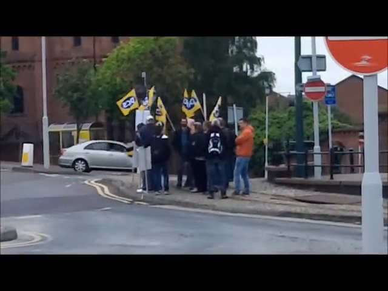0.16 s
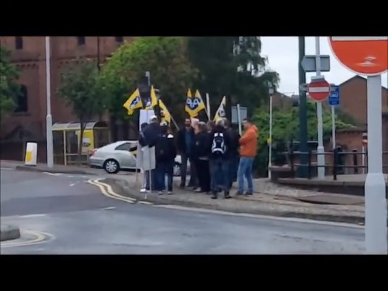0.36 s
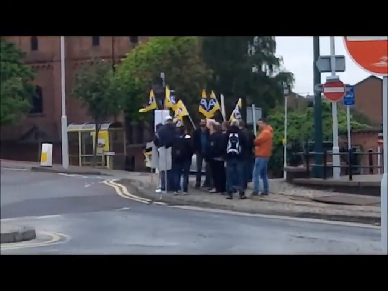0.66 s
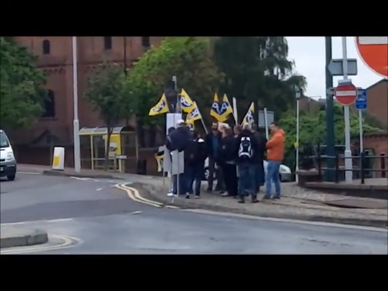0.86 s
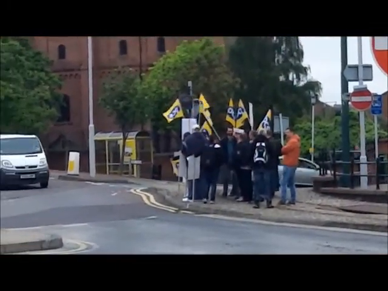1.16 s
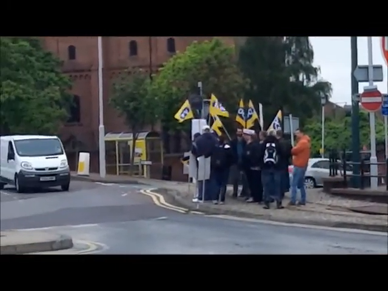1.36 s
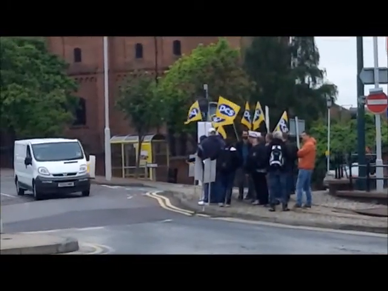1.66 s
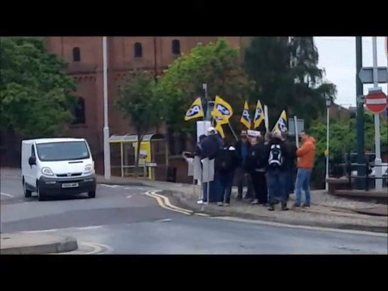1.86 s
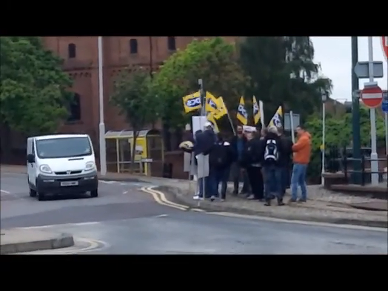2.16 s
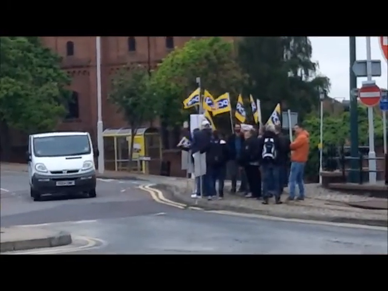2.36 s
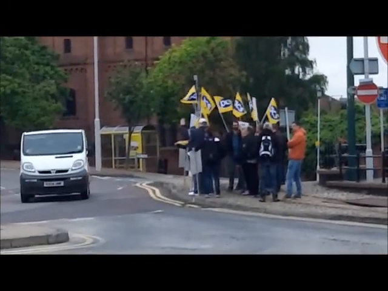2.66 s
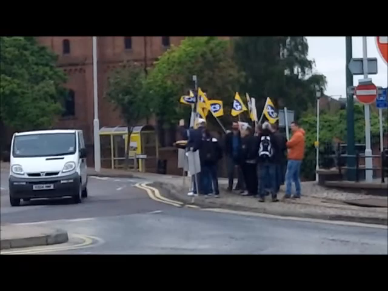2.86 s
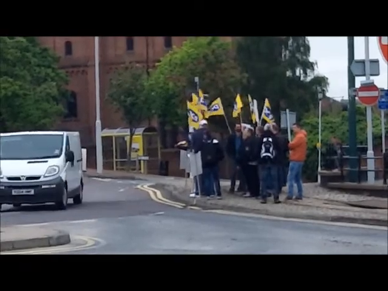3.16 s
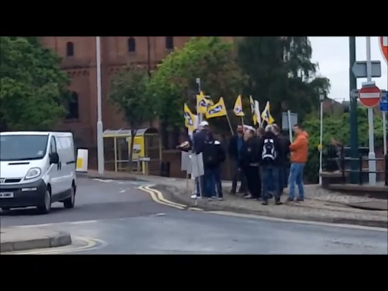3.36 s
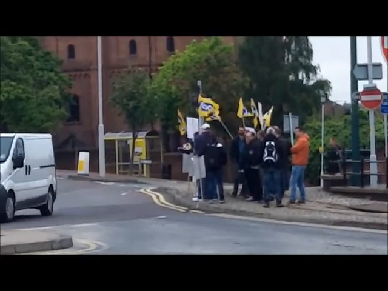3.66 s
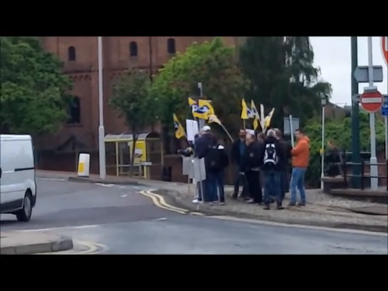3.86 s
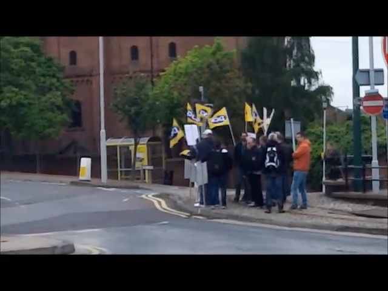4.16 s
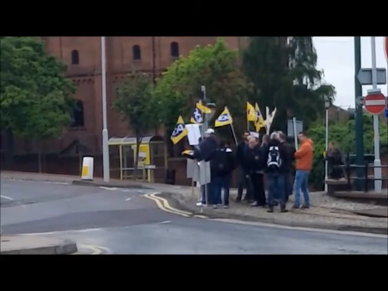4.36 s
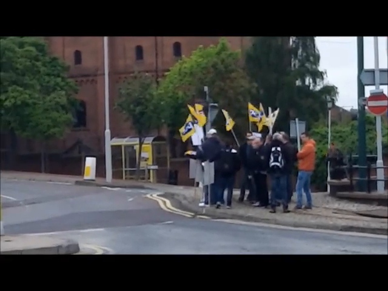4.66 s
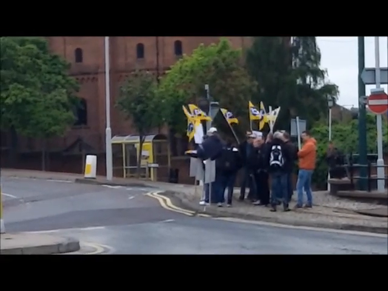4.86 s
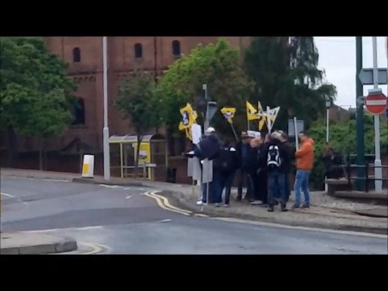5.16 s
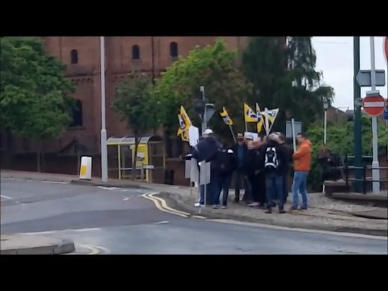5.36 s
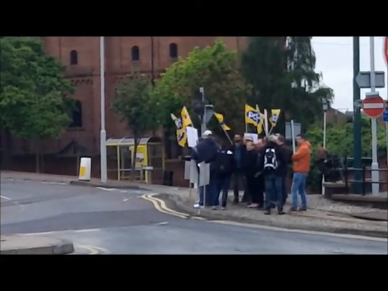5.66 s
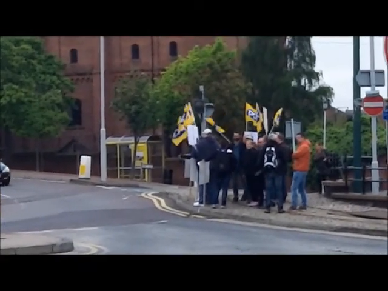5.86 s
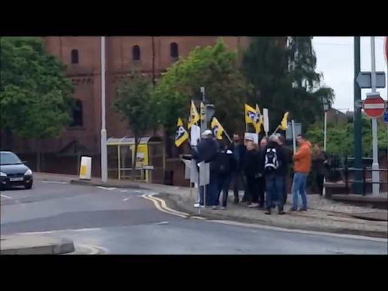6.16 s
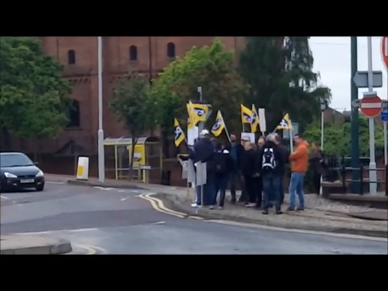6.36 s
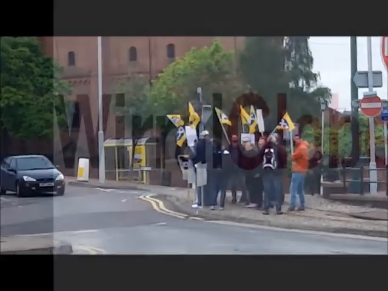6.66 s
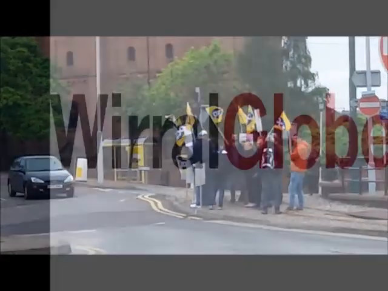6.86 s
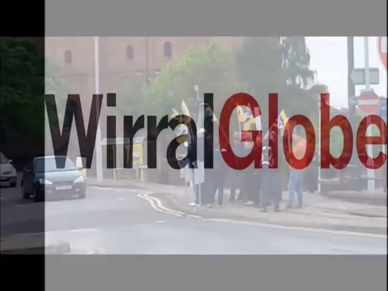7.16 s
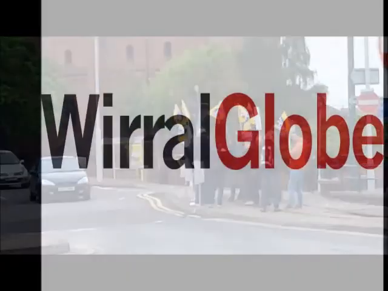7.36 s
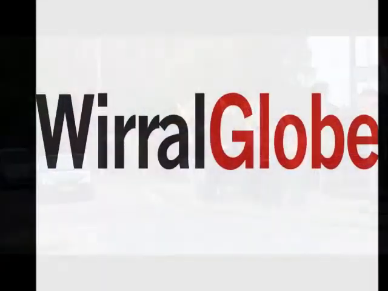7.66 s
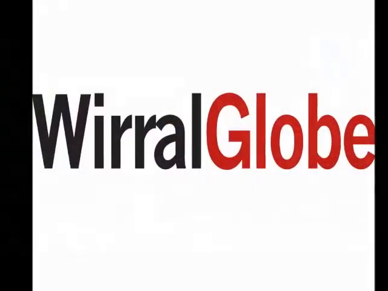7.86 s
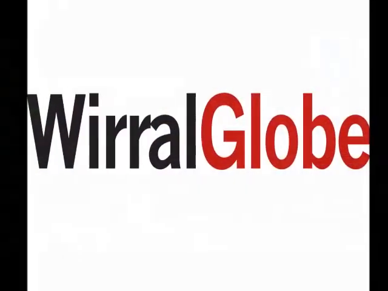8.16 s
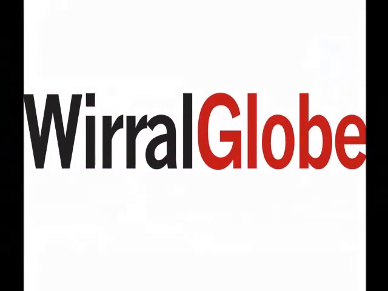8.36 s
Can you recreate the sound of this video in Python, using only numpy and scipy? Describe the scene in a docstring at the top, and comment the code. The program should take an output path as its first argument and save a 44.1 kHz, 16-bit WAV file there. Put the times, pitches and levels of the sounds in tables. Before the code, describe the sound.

Steady tyre roar and hiss at a road junction over throbbing diesel idles, with two quick horn taps early, fading gradually to silence.

```python
"""Tyres roar and hiss at a road junction heard from the pavement: shaped noise swells as each vehicle goes by.
Two diesels idle close by and beat against each other: steady tones at firing rates that differ slightly.
An alternator whines, gears and a brake sound as thin wavering tones, and injectors tick as gated noise.
A van taps its horn twice, summed from harmonics, and the walls answer with delayed, filtered copies.
All is mono and fades to silence in small steps."""
import sys
import numpy as np
from scipy import signal
from scipy.fft import rfft, irfft, next_fast_len
from scipy.io import wavfile
from scipy.ndimage import uniform_filter1d, map_coordinates

SR = 44100
rng = np.random.default_rng(int(sys.argv[2]) if len(sys.argv) > 2 else 0)


def master(y):
    """Save y as 16-bit WAV."""
    cut = np.clip(np.atleast_2d(y).T, -1, 1)
    pcm = np.round(cut * 32767)  # scale
    wavfile.write(sys.argv[1], SR, pcm.astype(np.int16))


N = 374850  # length in samples


def amp(db):
    """Turn decibels into gain."""
    return 10 ** (np.asarray(db) / 20)


def unit(x):
    """Scale x to an rms of 1."""
    return x / np.sqrt(np.mean(x ** 2) + 1e-20)


def curves(rows):
    """Join the points of each column after the time with straight lines, one value per sample."""
    times, *columns = np.transpose(rows)
    return [np.interp(np.arange(N) / SR, times, column) for column in columns]


def wobble(rate):
    """A smooth random curve with this many random points a second."""
    points = rng.standard_normal(int(N * rate / SR) + 4)
    return map_coordinates(points, [np.arange(N) * rate / SR])


def filtered(x, response):
    """Multiply the spectrum of x by a response that depends on frequency."""
    padded = next_fast_len(N + SR // 2)
    spectrum = rfft(x, padded) * response(np.fft.rfftfreq(padded, 1 / SR))
    return irfft(spectrum, padded)[..., :N]


def rush(spectrum, patchy_db, gate=1):
    """Coloured noise of rms 1, with random louder and softer patches in time and pitch."""
    grid = signal.stft(gate * rng.standard_normal(N), nperseg=512)[2]
    patches = uniform_filter1d(rng.standard_normal(grid.shape), 5, axis=0)
    patches = uniform_filter1d(patches, 10, axis=1)
    noise = signal.istft(grid * amp(patchy_db * unit(patches)), nperseg=512)[1][:N]
    f, db = np.transpose(spectrum)

    def colour(hz):
        return amp(np.interp(np.log(hz + 1), np.log(f + 1), db, -120, -120))

    return unit(filtered(noise, colour))


def tone(hz, db, partials, waver, flicker_db, lag=0, flickers_per_s=6):
    """Partials on one pitch track; the pitch wavers by a share and each partial flickers on its own."""
    turns = np.cumsum(hz * (1 + waver * wobble(25))) / SR - lag
    total = 0
    for multiple, level in partials:
        flicker = amp(level + flicker_db * wobble(flickers_per_s))
        total = total + flicker * np.cos(2 * np.pi * multiple * turns)
    return amp(db) * np.sqrt(2) * total  # the root of 2 makes the levels rms


def nearness(s, nears_s, leaves_s):
    """Power share of a source passing at steady speed: it falls with distance squared."""
    t = np.arange(N) / SR - s
    return 1 / (1 + (t / np.where(t < 0, nears_s, leaves_s)) ** 2)


# steady hiss at the top of the range: (f/Hz, level/dB per Hz)
TOP_HISS = [(7900, -94), (8150, -10), (8600, -6.5), (9800, 0), (10400, -4.5), (11600, -3), (11900, -33.5),
            (12200, -2.5), (15000, -4), (15600, -5.5)]


def top_hiss():
    """Steady, faint noise confined to the highest treble."""
    return amp(-57.0) * rush(TOP_HISS, patchy_db=2.0)


# brief faint hums in the traffic: (t/s, f/Hz, level/dB)
HUMS = [(.88, 427, -39.5), (1.38, 497, -38), (3.02, 570, -39.5), (3.05, 492, -43), (4.45, 720, -38.5)]
# a lone partial: (multiple of the pitch, level/dB)
SINGLE = [(1, 0)]
HUM_S = .19  # time for a hum to swell or sink by 6 dB


def hums():
    """Short low tones that swell out of the roar and sink back."""
    t = np.arange(N) / SR
    total = np.zeros(N)
    for s, hz, db in HUMS:
        swell_db = db - 6 * ((t - s) / HUM_S) ** 4
        total += tone(hz, swell_db, SINGLE, waver=.002, flicker_db=1.5)
    return total


# light brake squeal, sounded at 0.99 of this pitch: (t/s, f/Hz, level/dB)
BRAKE = [(6.5, 5950, -75), (6.65, 5880, -62), (6.9, 5750, -56), (7.1, 5700, -62), (7.3, 5680, -75)]


def brake():
    """A faint high tone sinks in pitch and flickers as a car slows down."""
    return tone(*curves(BRAKE), [(0.99, 0.0019)], waver=0.0038, flicker_db=5.0)


# gear tones, moving away and then coming near: (t/s, f/Hz, level/dB)
GEARS_AWAY = [(0, 706, -39), (.65, 705, -39.5), (1.1, 703, -43.5), (1.3, 702, -65)]
GEARS_NEAR = [(5.7, 700, -65), (5.95, 715, -46), (6.25, 735, -50), (6.31, 742, -36), (6.4, 768, -34.5),
              (6.47, 778, -36), (6.54, 778, -42), (6.62, 778, -34.5), (6.72, 770, -33), (6.85, 757, -35),
              (7.05, 745, -35), (7.12, 740, -60)]
# unsteadiness of the receding gears and the exhaust drone: pitch share, dB, flickers a second
DRONE_WAVER, DRONE_FLICKER_DB, DRONE_FLICKERS_PER_S = .007, 2.5, 12


def gears():
    """Two single gear tones: the receding one is broken, the nearing one steadier."""
    away = tone(*curves(GEARS_AWAY), SINGLE, waver=DRONE_WAVER, flicker_db=DRONE_FLICKER_DB,
                flickers_per_s=DRONE_FLICKERS_PER_S)
    near = tone(*curves(GEARS_NEAR), SINGLE, waver=.001, flicker_db=-1.5)
    return away + near


# the waiting engine settles, idles and pulls away:
# (t/s, firing rate f/Hz, engine level/dB, alternator level/dB)
WAITING = [(0, 29.26, -44, -60), (.7, 29.3, -44, -56), (1, 29.5, -44, -55), (1.5, 29.75, -42.5, -54),
           (2.5, 29.9, -40, -52), (3.2, 30.0, -40, -51), (3.8, 30.0, -40, -51), (4.2, 29.86, -40, -51.5),
           (4.8, 30.0, -40.5, -51.5), (6.15, 30.03, -42, -51.5), (6.35, 30.1, -45, -75),
           (6.8, 30.2, -52, -75)]
# alternator lines: multiples of its pitch
WHINE_LINES = [9, 13, 15.95, 17, 17.92]
# the lines swell and sink at different times: (t/s, then level/dB of each line over the alternator level)
WHINE_SWELLS = [(0, 0, 0, -4, -3, -6), (1.8, 1, 1, -4, -2, -2), (2.2, 3, 4, 4, -3, -1),
                (3.02, 0, 5, -2, -2, -4), (3.15, 0, 6, -2, 8, -5), (3.3, 0, 6, -2, 8, -5),
                (3.42, 0, 4, -2, 1, -4), (3.58, 1, 6, 7, 4, -3), (4.1, 6, -2, -1, 1, -2),
                (4.6, 5, 4, 6, 4, -4), (5.0, 2, 7, 2, 3, -3), (5.4, 6, 8, -2, 6, -4), (6.2, 2, 7, 0, 5, -5)]
PULLEY = 8.373  # alternator pitch over the firing rate
HUNT, HUNTS_PER_S = .0012, 2.5  # the belt's speed wanders: share, random points a second
# the lines come in short dashes: pitch share, dB, flickers a second
WHINE_WAVER, WHINE_FLICKER_DB, WHINE_FLICKERS_PER_S = .0012, 2.2, 13


def alternator():
    """Thin lines driven by the engine through a belt, so their pitch follows the firing rate."""
    rate, _, db = curves(WAITING)
    pitch = PULLEY * rate * (1 + HUNT * wobble(HUNTS_PER_S))
    lines = zip(WHINE_LINES, curves(WHINE_SWELLS))
    return tone(pitch, db, lines, waver=WHINE_WAVER, flicker_db=WHINE_FLICKER_DB,
                flickers_per_s=WHINE_FLICKERS_PER_S)


# horn taps: (t/s, length/s, level/dB, echo level/dB, extra third-harmonic level/dB, extra fifth level/dB)
# the harmonic levels change as the van turns
TOOTS = [(1.236, .038, -17, 1, 0, 1), (1.389, .035, -16, -6.5, 2, -6)]
# horn sound: (harmonic number, level/dB, rise/s)
HORN = [(1, -14, .02), (2, -7.5, .015), (3, -4, .022), (4, 0, .018), (5, -7, .016), (6, -11.5, .03),
        (7, -17, .016)]
# echoes: (delay/s, level/dB, brightest f/Hz)
WALLS = [(.036, -6, 1300), (.04, -7, 2800), (.118, 1.5, 1500), (.135, -7, 1450), (.195, -5, 1400),
         (.268, -11, 1950), (.338, -8, 1750)]
HORN_HZ = 512.6
SAG, SETTLE_S = .016, .012  # the reed starts flat by this share and settles with this time constant


def soft(u):
    """A smooth step from 0 to 1 as u goes from 0 to 1."""
    return np.sin(np.clip(u, 0, 1) * np.pi / 2) ** 2


def walls(f):
    """Each wall delays the horn and favours its own band of frequencies."""
    total = 0
    for delay, db, hz in WALLS:
        octave_band = (np.log((f + 1) / hz) / .33) ** 2
        total = total + amp(db) * np.exp(-2j * np.pi * f * delay - octave_band)
    return total


def horn():
    """Two short taps of a disc horn, with echoes from walls and a diffuse tail of fading noise."""
    t = np.arange(N) / SR
    direct, thrown = np.zeros(N), np.zeros(N)
    for s, length, db, echo_db, third_db, fifth_db in TOOTS:
        age = np.abs(t - s)
        turns = HORN_HZ * (age + SAG * SETTLE_S * np.exp(-age / SETTLE_S))
        extra_db = {3: third_db, 5: fifth_db}
        reed = np.zeros(N)
        for k, level, rise in HORN:
            strength = amp(level + extra_db.get(k, 0)) * soft((t - s) / rise)
            reed += strength * np.sin(2 * np.pi * k * (turns + rng.random()))
        tap = amp(db) * soft((s + length - t) / 0.012) * reed
        direct += tap
        thrown += amp(echo_db) * tap
    tail_t = t[:SR // 2]
    tail = rng.standard_normal(len(tail_t)) * amp(-60 * tail_t / .9)  # falls 60 dB per 0.9 s
    diffuse = signal.fftconvolve(direct, tail / np.linalg.norm(tail))[:N]
    return direct + filtered(thrown, walls) + amp(-5.5) * diffuse


# colour of the ticking: (f/Hz, level/dB per Hz)
INJECTORS = [(3400, -40), (4200, 0), (5200, -5.5), (5700, -15.5), (6150, -2), (6500, -10.5), (7000, -41.5)]
# loudness of the ticking: (t/s, level/dB)
TICKING = [(0, -48.5), (.25, -43), (.7, -49), (1.2, -51), (2.6, -55), (3.2, -46), (4, -49), (5, -51),
           (7.8, -62)]
# tick strength of the firings in one shaft turn: level/dB of each
CYLINDERS = [-2, -2, 0]
TICK_LAG, TICK_DECAY_DB = .33, 50  # share of a firing before the tick, fall over one firing


def injectors():
    """Sharp ticks once a firing; the three firings of a shaft turn differ in strength."""
    turns = np.cumsum(curves(WAITING)[0]) / SR + 1 - TICK_LAG
    cylinder_db = np.array(CYLINDERS)[turns.astype(int) % len(CYLINDERS)]
    ticks = amp(cylinder_db + 1.1 * wobble(11) - TICK_DECAY_DB * (turns % 1))
    return amp(curves(TICKING)[0]) * rush(INJECTORS, patchy_db=1.5, gate=ticks)


# exhaust drone: (t/s, f/Hz, level/dB)
DRONE = [(0, 248, -60), (.22, 250, -52), (.38, 250.3, -35.5), (.6, 244.5, -50), (1.3, 246, -42.5),
         (1.9, 254.8, -40.5), (2.12, 256.7, -36), (2.3, 254, -65)]


def exhaust_drone():
    """One broken, unsteady low tone."""
    return tone(*curves(DRONE), SINGLE, waver=2 * DRONE_WAVER, flicker_db=DRONE_FLICKER_DB,
                flickers_per_s=DRONE_FLICKERS_PER_S)


# an approaching car's engine: (t/s, firing rate f/Hz, level/dB)
CAR = [(5.35, 39, -60), (5.55, 39.3, -41), (5.7, 40.2, -40), (5.85, 40.2, -43), (6.0, 40.6, -39),
       (6.2, 40.3, -43), (6.35, 40, -60)]
# its partials: (multiple of firing rate, level/dB)
CAR_ORDERS = [(4, 0), (5, -1.5), (6, -4)]


def car_engine():
    """Higher multiples of the firing rate, with a slight waver."""
    return tone(*curves(CAR), CAR_ORDERS, waver=.003, flicker_db=0.5)


# the van engine's partials: (multiple of firing rate, level/dB)
VAN_ORDERS = [(2, -1), (3, -11.5), (6, -12.5)]
VAN_HZ, VAN_DB = 23.83, -39  # firings a second, level at the nearest moment
VAN_S, VAN_NEARS_S, VAN_LEAVES_S = 1.8, .9, .4  # nearest moment, times for 3 dB before and after


def van_engine():
    """A steady engine tone that swells and fades with the van's distance."""
    near = nearness(VAN_S, VAN_NEARS_S, VAN_LEAVES_S) ** .5  # root turns power into gain
    return near * tone(VAN_HZ, VAN_DB, VAN_ORDERS, 0, flicker_db=0.0)


# partials of the parked and the waiting engine: (multiple of firing rate, level/dB)
PARKED_ORDERS = [(1, 1.5), (2, -8.5)]
WAITING_ORDERS = [(1, -0.5), (2, -3.5), (4, -10)]
PARKED_HZ, PARKED_DB = 27.48, -42  # steady idle: firings a second, level
PARKED_LAG = .2  # share of a firing by which it starts behind the waiting engine


def idling_diesels():
    """Low multiples of two close firing rates, which beat about twice a second."""
    rate, db, _ = curves(WAITING)
    parked = tone(PARKED_HZ, PARKED_DB, PARKED_ORDERS, 0, flicker_db=0.0, lag=PARKED_LAG)
    waiting = tone(rate, db, WAITING_ORDERS, 0, flicker_db=2.6)
    return parked + waiting


# distant traffic: level/dB of exhaust rumble, tyre roar, tread hiss, body drumming
STREET_DB = (-32.5, -26, -33, -36)
# vehicles going by: (nearest t/s, time to fall 3 dB/s, then at the nearest point
# rumble level/dB, roar level/dB, hiss level/dB, drumming level/dB)
PASSES = [(0.1, .5, -35.5, -32.5, -33, -38.5), (1.2, 0.55, -38.5, -38, -36, -36.5),
          (3.1, 0.5, -55, -30.5, -38, -43.5), (4.3, 0.44, -38, -35, -39.5, -39.5),
          (5.75, 1.5, -45.5, -38.5, -42.5, -44.5), (6.75, 0.55, -38, -37, -38.5, -34.5),
          (7.7, 0.06, -38, -27.5, -31.5, -37)]
SWAY_DB, SWAYS_PER_S = .5, 2.954  # each layer drifts on its own: size, random points a second


def street():
    """Gains of rumble, roar, hiss and drumming: the powers of distant and passing traffic add up."""
    power = amp(STREET_DB)[:, None] ** 2
    for s, span, *db in PASSES:
        power = power + amp(db)[:, None] ** 2 * nearness(s, span, span)
    return [np.sqrt(p) * amp(SWAY_DB * wobble(SWAYS_PER_S)) for p in power]


# exhaust rumble: (f/Hz, level/dB per Hz)
RUMBLE = [(8, -22.5), (20, -13.5), (30, -10.5), (40, -5.5), (58, 0.5), (85, -9), (129, -5), (174, -5.5),
          (215, -4), (257, -3), (356, -7), (450, -21), (580, -34.5), (990, -120)]


def exhaust_rumble(gain):
    """Many exhausts blend into smooth low noise."""
    return gain * rush(RUMBLE, patchy_db=0.1)


# drumming of body panels: (f/Hz, level/dB per Hz)
BODY = [(260, -37), (400, -2.5), (500, 1), (700, -1), (800, -6.5), (1000, -39)]


def panel_drumming(gain):
    """Vehicle panels drum in a band of low-middle noise."""
    return gain * rush(BODY, patchy_db=1.0)


# the van's tyres sing in a narrow band: (f/Hz, level/dB per Hz)
SONG = [(700, -40), (900, -3), (1100, -0.5), (1300, -5), (1700, -40)]
SONG_S, SONG_NEARS_S, SONG_LEAVES_S = 4.3, 1.1, 0.66  # loudest moment, times for 3 dB before and after
SONG_DB, SURGE_DB = -32.5, 1  # level, unevenness


def tyre_song():
    """A focused band of roar that surges unevenly as the van goes by."""
    near = nearness(SONG_S, SONG_NEARS_S, SONG_LEAVES_S) ** .5
    return near * amp(SONG_DB + SURGE_DB * wobble(5)) * rush(SONG, patchy_db=1.5)


# tread hiss: (f/Hz, level/dB per Hz)
TREAD = [(1350, -24.5), (2300, -3.5), (2400, -4.5), (2780, -0.5), (3810, -5.5), (4400, -7), (6370, -19.5),
         (7030, -24), (7500, -43), (9750, -75), (16500, -120)]


def tread_hiss(gain):
    """Treads hiss in the treble; diesel clatter pulses the hiss once a firing."""
    firing = np.cos(2 * np.pi * (np.cumsum(curves(WAITING)[0]) / SR - TICK_LAG))
    clatter = 1 + 0.073 * firing * amp(2.5 * wobble(1.8))
    return gain * amp(0.11 * wobble(13)) * rush(TREAD, patchy_db=0.92, gate=clatter)


# tyre roar: (f/Hz, level/dB per Hz)
ROAR = [(240, -37), (400, -10), (695, -3), (829, -3.5), (944, 0), (1110, 0.5), (1330, -1), (1730, -2),
        (1970, -5), (2210, -5), (2500, -9.5), (3250, -23), (5500, -120)]


def tyre_roar(gain):
    """Tyres on the road make broad noise in the middle of the range."""
    return gain * rush(ROAR, patchy_db=0.6)


def traffic():
    """Exhausts, panels, treads and tyres, each following the passing vehicles."""
    rumble, roar, tread, drum = street()
    background = exhaust_rumble(rumble) + panel_drumming(drum)
    return background + tyre_song() + tread_hiss(tread) + tyre_roar(roar)


def scene():
    """Add all sources in one channel."""
    thin_tones = hums() + brake() + gears() + alternator()
    engines = exhaust_drone() + car_engine() + van_engine() + idling_diesels()
    return (top_hiss() + thin_tones + horn() + injectors() + engines + traffic())[None]


# fade to zero: start t/s, end t/s, steps a second
FADE = (4.33, 7.765, 29.97)
TOP_HZ = 15050  # nothing sounds at or above this frequency


def record(dry):
    """A straight fade to silence that moves in small steps, then the band limit."""
    start, end, rate = FADE
    step = np.floor((np.arange(N) / SR - end) * rate + .15) - .15
    fader = np.interp(end + step / rate, [start, end], [1, 0])
    fader = uniform_filter1d(fader, size=40)  # rounds the edges of the steps
    return filtered(fader * dry, lambda hz: hz < TOP_HZ) * (fader > 1e-9)


dry = scene()
out = record(dry)
master(out)
```